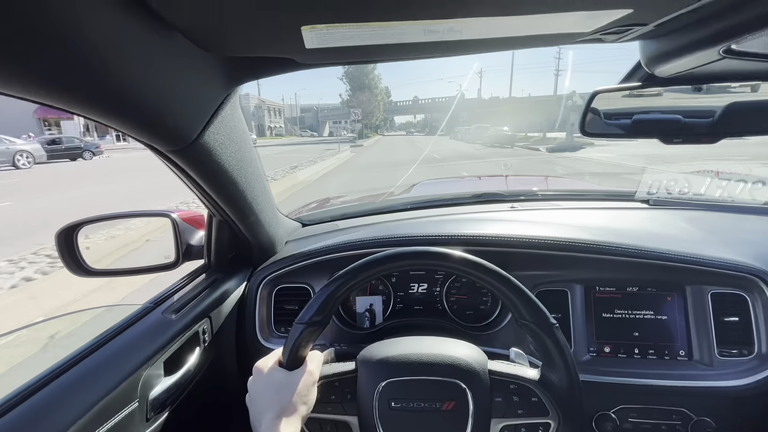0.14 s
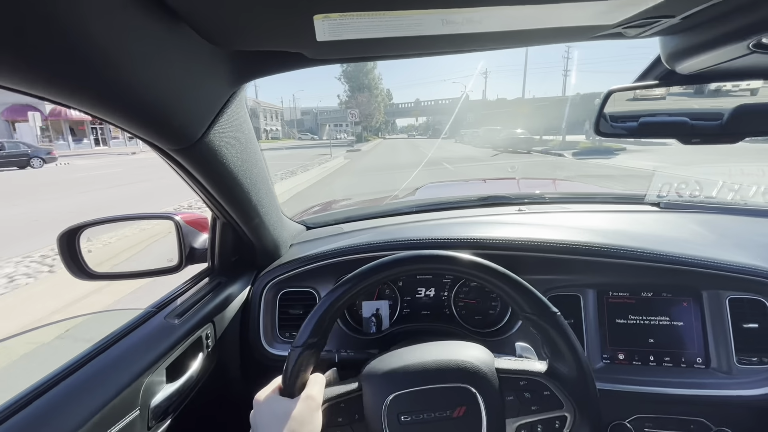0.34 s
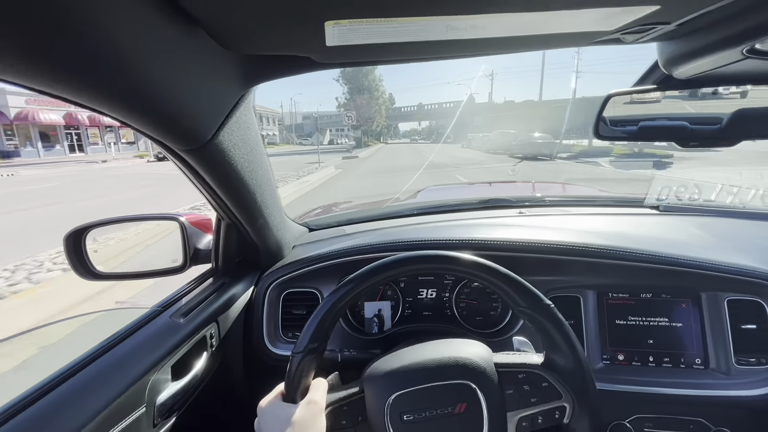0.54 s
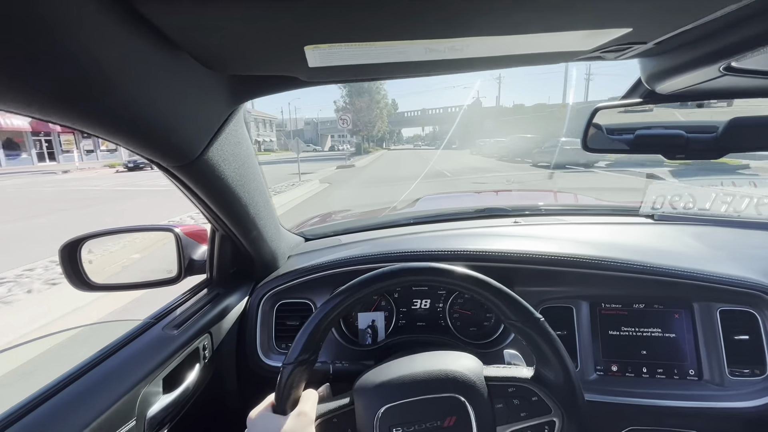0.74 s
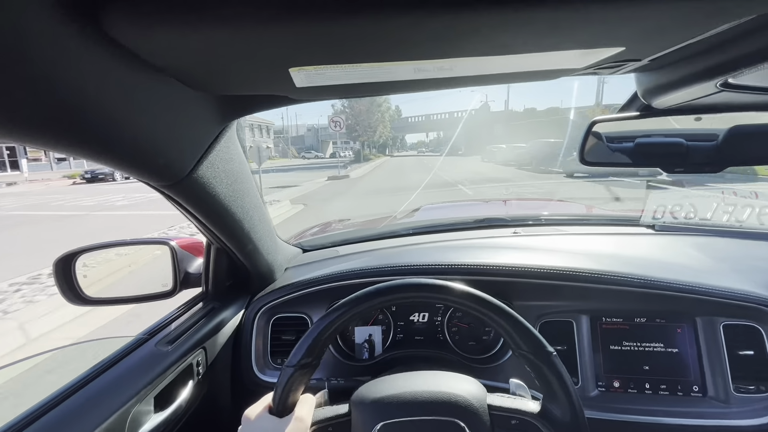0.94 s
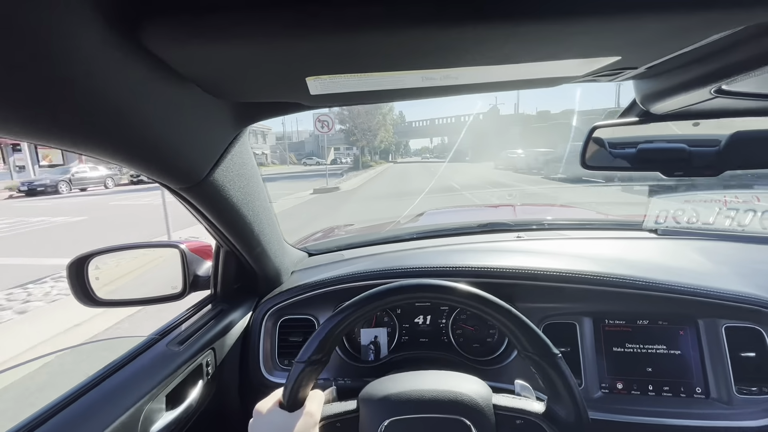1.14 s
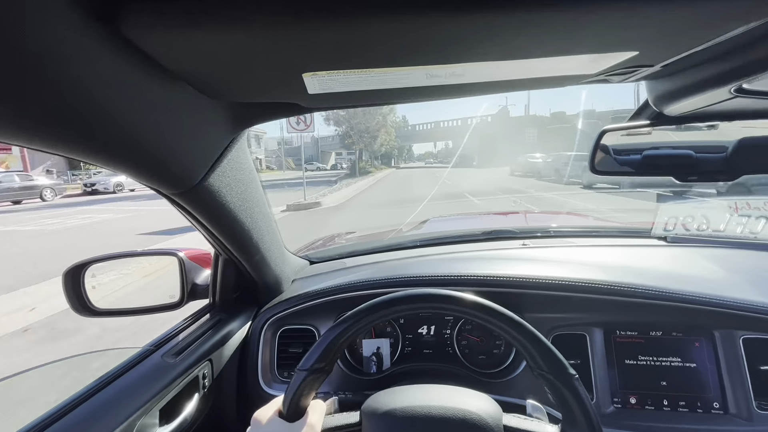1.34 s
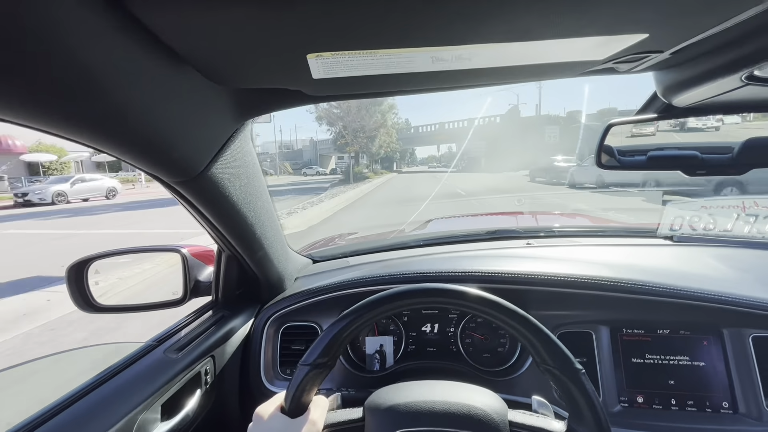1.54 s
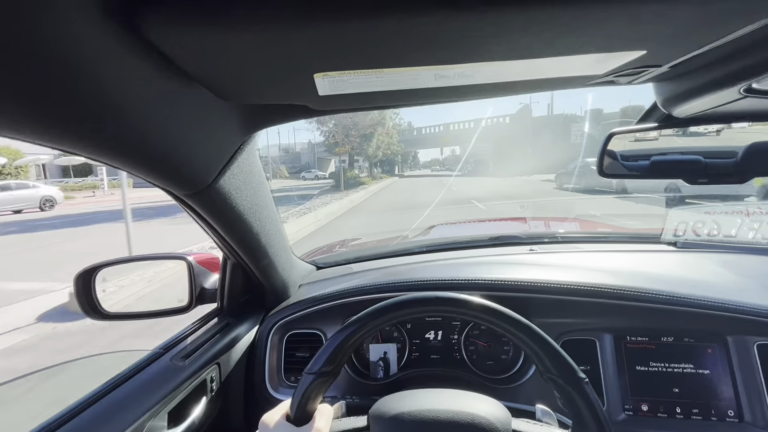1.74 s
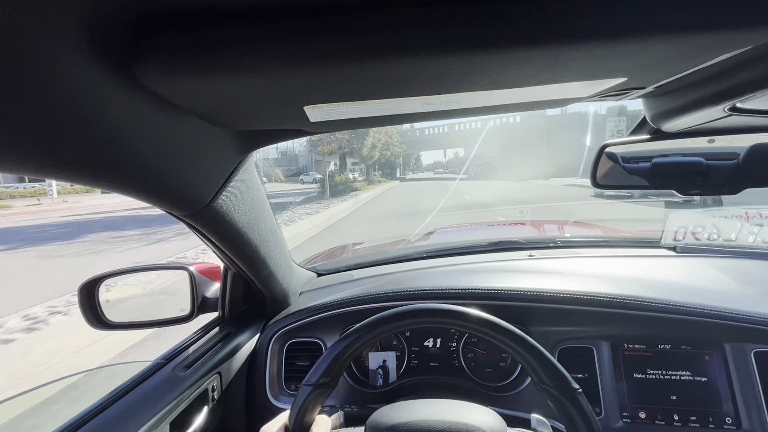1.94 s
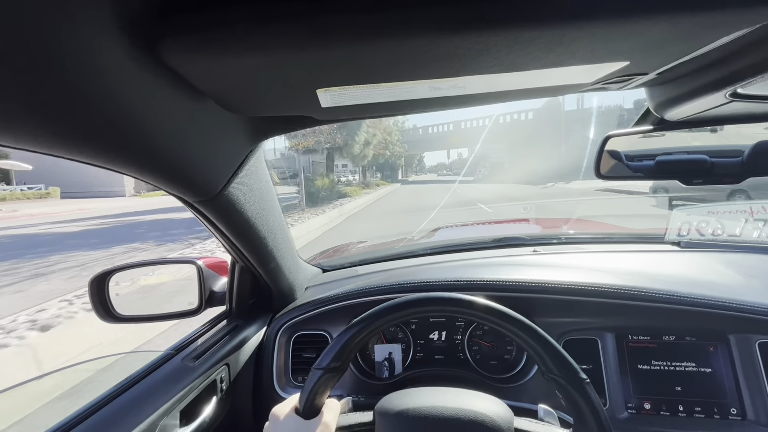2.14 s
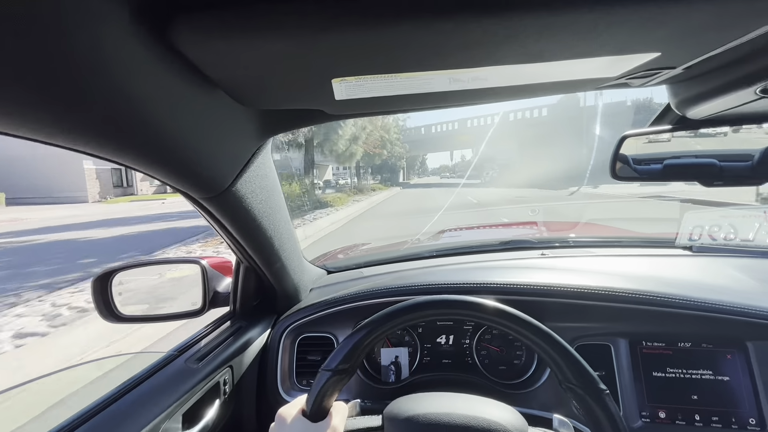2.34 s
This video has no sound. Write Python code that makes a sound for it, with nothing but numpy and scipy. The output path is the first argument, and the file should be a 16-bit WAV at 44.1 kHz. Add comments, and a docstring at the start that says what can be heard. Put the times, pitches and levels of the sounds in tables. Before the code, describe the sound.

Loud raspy V8 growl climbs in pitch, crackles at a gear shift, and falls to a low drone

```python
"""A V8 pulls hard, heard from the driver's seat; it shifts up as the throttle closes near 1 s, then cruises.
The exhaust is a sum of multiples of the engine cycle rate, shaped by the resonances of pipe and cabin.
Each firing gates turbulent noise into a puff of rush and rasp; one cylinder cracks once a cycle, then pops in
the shift. A drone of low orders swells in the booms of the body shell, over filtered noise for tyres and wind."""
import sys
import numpy as np
from scipy import signal
from scipy.fft import rfft, irfft, next_fast_len
from scipy.io import wavfile

SR = 44100
rng = np.random.default_rng(int(sys.argv[2]) if len(sys.argv) > 2 else 0)


def int16_out(signal):
    """Quantize to a 16-bit WAV file."""
    q = np.round(np.clip(np.atleast_2d(signal).T, -1, 1) * 32767)
    wavfile.write(sys.argv[1], SR, q.astype(np.int16))


N = 105972
TIME = np.arange(N) / SR
SIDES = np.array([[1], [-1]])   # left, right

FIRST_FIRING = .465   # place of the cracking cylinder in the engine cycle (cycles)
IN_STEP_ORDERS = 14   # orders above this are scrambled by reflections

# orders of the exhaust under load: order (multiple of the cycle rate), relative_level_db
PULL_ORDERS = [(2, -29), (3, -20), (4, -19.5), (5, -14), (6, -36), (7, -43), (8, -21.5), (9, -20),
               (10, -37), (11, -25), (12, -49.5), (13, -28.5), (14, -35.5), (15, -35.5), (16, -27),
               (17, -36), (18, -26.5), (19, -33), (20, -39), (21, -33.5), (22, -48), (23, -31.5), (24, -60),
               (25, -33.5), (26, -34.5), (27, -43), (28, -39.5), (29, -35.5), (30, -34.5), (31, -45.5),
               (32, -42.5), (33, -50), (34, -35)]
# resonances and notches of pipe and cabin: centre_hz, spread_hz (standard deviation), gain_db
CABIN_RESONANCES = [(86.2, 4.9, 11), (129.8, 7.3, 5.5), (249, 14, -8), (257.5, 2.4, 3), (289.2, 2.7, -6),
                    (350, 20, 5.5), (392, 15, -17), (411, 12, 4.5), (458.4, 10.6, 9.5), (506.5, 5.9, 0.5),
                    (541, 4.6, -14), (560, 21, 3.5), (589.8, 2.5, -8.5), (639, 21, -4.5), (735, 35, 2.5)]
# load on the engine: time_s, gain_db
LOAD = [(0, 1), (.2, -1.5), (.5, -3.5), (.81, -6), (.92, -5.5), (1.0, -7.5), (1.06, -12.5), (1.1, -15.5),
        (1.16, -44), (2.4, -70)]
# uneven firing in the shift moves power between low orders: order, centre_s, spread_s, gain_db
SHIFT_SWELLS = [(4, .93, 0.062, 7), (3, .95, .035, -8), (3, 1.032, 0.018, 7), (4, 1.018, .02, -5),
                (9, 0.953, 0.035, -4), (8, .95, 0.053, -11.5), (6, 1.5, .06, 1)]
# gain of the orders above the in-step ones, fading in the shift: time_s, gain_db
UPPER_ORDERS = [(0, -1), (.4, 0), (.82, 0), (.9, -1), (1.1, -2.5)]
# the firing turns ragged in the shift: time_s, roughness (0-1)
RAGGED = [(0, .05), (.81, .06), (.88, .17), (1.06, .22)]
ROUGH_ORDER = 19   # order at which the roughness has doubled
THROB_DEPTH, THROB_LEAD = .27, .31   # once-a-cycle swell: depth, phase lead (cycles); peaks just before the crack
BASS_PAN_DB = -0.5   # left minus right


def exhaust(cycles, rate):
    """Source-filter principle: harmonics of the engine cycle sweep through fixed resonances of pipe and cabin."""
    (load_db,), (rough,), (upper_db,) = in_time(LOAD), in_time(RAGGED), in_time(UPPER_ORDERS)
    throb = 1 + THROB_DEPTH * np.sin(2 * np.pi * (cycles - FIRST_FIRING + THROB_LEAD))
    upper_gain = from_db(upper_db) * throb
    total = 0
    for order, order_db in PULL_ORDERS:
        swells = [row[1:] for row in SHIFT_SWELLS if row[0] == order]
        shift_db = bumps_db(swells, TIME)
        cabin_db = bumps_db(CABIN_RESONANCES, order * rate)
        tone = partial(order, cycles, rate, rough * (1 + (order / ROUGH_ORDER) ** 2))
        tone = from_db(order_db + cabin_db + load_db + shift_db) * tone
        if order > IN_STEP_ORDERS:
            tone = tone * upper_gain
        total = total + tone
    return total * from_db(SIDES * BASS_PAN_DB / 2)


# spectral envelope of the upper orders: frequency_hz, relative_level_db
GROWL_SPECTRUM = [(1100, 5.5), (1300, 6.5), (1600, 7.5), (1900, 4), (2300, -10), (2750, -12), (3400, -21)]
# left minus right of the engine's treble: frequency_hz, difference_db
LEAN = [(200, -12.5), (550, 4), (1000, 0.5), (1900, 5.5), (2800, 0.5), (3800, -5), (6000, 2.5), (9000, -2)]
# level of the rasp, whose fall the growl also follows: time_s, level_db
RASP = [(0, -28.5), (.2, -32.5), (.5, -35), (.82, -36.5), (.91, -31.5), (.97, -38.5), (1.005, -38.5),
        (1.035, -46.5), (1.2, -58.5), (1.35, -62.5), (2.4, -90)]
GROWL_DB, GROWL_ROUGH = -32, .2
GROWL_PUFF = 0.11   # share of the growl shaped by the puffs


def growl(cycles, rate, firing):
    """Amplitude modulation: rough upper orders throb with the firings and follow the fall of the rasp."""
    rasp_db, = in_time(RASP)
    total = 0
    for order in range(35, 88):
        hz = order * rate[:SR].mean()
        level_db = at_hz(GROWL_SPECTRUM, hz) + SIDES * at_hz(LEAN, hz) / 2 + rng.normal(0, 3.5)
        total = total + from_db(level_db) * partial(order, cycles, rate, GROWL_ROUGH)
    throbbing = total * (1 - GROWL_PUFF + GROWL_PUFF * rms_one(firing))
    return from_db(GROWL_DB + rasp_db - rasp_db[0]) * rms_one(throbbing)


# level of the rush of gas in the pipes: time_s, level_db
RUSH = [(0, -30.5), (.4, -23.5), (.8, -25), (.92, -24), (1.06, -25.5), (1.16, -37), (1.3, -40.5),
        (1.5, -45.5), (2.4, -95.5)]
# colour of the rush: frequency_hz, relative_level_db
RUSH_SPECTRUM = [(25, -16), (55, -5.5), (85, 3.5), (130, -18.5), (180, 1.5), (225, -1), (270, -3.5),
                 (335, 6.5), (390, 0.5), (455, 9.5), (530, -35.5), (605, 2.5), (680, -3.5), (900, -6),
                 (1300, -18), (2500, -38.5), (8000, -58.5)]
# colour of the rasp: frequency_hz, relative_level_db
RASP_SPECTRUM = [(300, -27), (700, -27.5), (1100, -2.5), (1500, -2), (1950, 0), (2800, 1), (3300, -7),
                 (4000, -7.5), (5000, -13.5), (6500, -21), (8200, -18), (10500, -39.5), (13000, -24.5),
                 (15500, -48)]


def gas(firing):
    """Turbulence noise gated by pulsed flow: every firing gives a low rush and a bright rasp."""
    rush = from_db(in_time(RUSH)[0]) * cabin_noise(RUSH_SPECTRUM, firing)
    rasp = from_db(in_time(RASP)[0]) * cabin_noise(RASP_SPECTRUM, firing)
    return rush + rasp


# onset level of the crack under load: time_s, level_db
CRACK = [(0, -12.5), (.25, -15), (.6, -17), (.83, -17.5)]
# pops that replace the cracks as the throttle closes: start_s, level_db
POPS = [(.857, -16.5), (.883, -13), (.911, -11.5), (.939, -15), (.969, -21), (1.0, -16.5)]
# colour of cracks and pops: frequency_hz, relative_level_db
CRACK_SPECTRUM = [(300, -9.5), (600, 16.5), (1100, 18), (1500, -5), (2000, 12), (2800, 8.5), (3800, 2),
                  (5000, -7), (6500, -25), (8500, -23.5), (15000, -39)]
SHIFT_S = .845   # cracks stop here
CRACK_DECAY_S = .0007
CRACK_FRESH = .8   # amplitude of fresh noise relative to the repeated part
CRACK_RING, CRACK_RING_S = .32, .005   # ring in the pipe: relative amplitude, decay (s)


def crack(cycles, rate):
    """Impulsive excitation: a partly repeated noise burst, mixed with fresh noise at each blow, rings briefly."""
    crack_s, crack_db = np.transpose(CRACK)
    beats = np.interp(np.arange(FIRST_FIRING, cycles[-1]), cycles, TIME)
    cracks = [(s, np.interp(s, crack_s, crack_db)) for s in beats if s < SHIFT_S]
    start, level_db = np.transpose(cracks + list(POPS))
    latest = np.searchsorted(start, TIME) - 1
    age = np.abs(TIME - start[latest])
    # noise read by age is the part that repeats at each blow
    repeated = rng.standard_normal((2, N))[:, (age * SR).astype(int)]
    burst = repeated + CRACK_FRESH * rng.standard_normal((2, N))
    decay = np.hypot(np.exp(-age / CRACK_DECAY_S), CRACK_RING * np.exp(-age / CRACK_RING_S))
    gate = from_db(level_db[latest]) * decay
    return np.sqrt(np.mean(gate ** 2)) * cabin_noise(CRACK_SPECTRUM, gate, white=burst)


# orders of the exhaust at light throttle: order (multiple of the cycle rate), relative_level_db
CRUISE_ORDERS = [(2, -46.5), (3, -34), (4, -37.5), (5, -34.5), (6, -45), (7, -59), (8, -39.5), (9, -44.5),
                 (10, -45.5), (11, -45), (12, -50), (13, -48.5), (14, -53.5), (15, -58.5), (16, -56),
                 (17, -49)]
# booms of the body shell at light throttle: centre_hz, spread_hz (standard deviation), gain_db
SHELL_BOOMS = [(76, 8, 4.5), (126.3, 2.4, 6), (197, 18.2, 9.5), (265.4, 9, 9), (349, 14, 6)]
# gain of the cruising drone: time_s, gain_db
DRONE = [(0, -46.5), (1.0, -1), (1.15, -7), (1.4, -2), (1.7, -0.5), (1.87, -1), (2.0, -0.5), (2.1, -4),
         (2.4, -4)]
DRONE_ROUGH = .17


def drone(cycles, rate):
    """Structural resonance: soft low orders swell as they slide through the booms of the body shell."""
    total = 0
    for order, order_db in CRUISE_ORDERS:
        boom_db = bumps_db(SHELL_BOOMS, order * rate)
        total = total + from_db(order_db + boom_db) * partial(order, cycles, rate, DRONE_ROUGH)
    return from_db(in_time(DRONE)[0]) * total


# tyres on the road: time_s, rumble_level_db, hiss_level_db
ROAD = [(0, -35, -47.5), (.7, -34.5, -45), (1.1, -23.5, -48.5), (1.35, -32.5, -50), (1.7, -30, -47.5),
        (1.87, -27, -48), (2.15, -25, -44.5), (2.4, -29.5, -47)]
# colour of the rumble: frequency_hz, relative_level_db
RUMBLE_SPECTRUM = [(22, -21), (32, 0.5), (50, 1.5), (75, 0), (105, -3.5), (140, -6), (190, -2.5),
                   (235, -14), (280, -9.5), (350, -16.5), (430, -20.5), (600, -27), (1000, -47.5),
                   (3000, -89.5)]
# colour of the hiss: frequency_hz, relative_level_db
HISS_SPECTRUM = [(300, -15.5), (500, -3), (800, -1.5), (1000, -7), (1400, -16), (1900, -22), (2700, -25.5),
                 (3500, -32), (4600, -31.5), (5800, -39), (15000, -53.5)]


def road():
    """Broadband rolling noise: tyre rumble through the body and a faint hiss above it."""
    rumble_db, hiss_db = in_time(ROAD)
    rumble = from_db(rumble_db) * cabin_noise(RUMBLE_SPECTRUM, lean=0)
    hiss = from_db(hiss_db) * cabin_noise(HISS_SPECTRUM, lean=0)
    return rumble + hiss


# air over the body: time_s, level_db
WIND = [(0, -63), (1.3, -62.5), (1.5, -69.5), (1.75, -67.5), (1.95, -60.5), (2.15, -61), (2.4, -63)]
# colour of the air: frequency_hz, relative_level_db
WIND_SPECTRUM = [(800, -10.5), (1900, -2.5), (2700, 3), (3500, -6.5), (4600, -5.5), (5800, -15),
                 (7800, -11.5), (10000, -26), (15000, -30)]


def wind():
    """Aerodynamic noise: air over the body is a faint filtered hiss."""
    return from_db(in_time(WIND)[0]) * cabin_noise(WIND_SPECTRUM, lean=0)


PIPE_LAG, PIPE_SMEAR = 1.267, .147   # delay of the lowest orders (cycles); each higher order comes sooner
WAVER_HZ = 11   # corner of the slow random waver
SPREAD_HZ, SPREAD_RAD = 500, 1.35   # above this pitch the sides fall out of step, by about this phase or more


def partial(order, cycles, rate, rough):
    """Dispersion and random modulation: one order, nominally rms 1, delayed by the pipe and wavering."""
    angle = 2 * np.pi * order * (cycles - PIPE_LAG + PIPE_SMEAR * order)
    high = (order * rate.mean() / SPREAD_HZ) ** 4
    apart = SPREAD_RAD * high / (1 + high) * rng.uniform(1, 1.52) * rng.choice([-1, 1])
    waver = 1 + rough * (drift(WAVER_HZ) + 1j * drift(WAVER_HZ))
    if order > IN_STEP_ORDERS:
        waver = waver * ripple(order * rate) * np.exp(2j * np.pi * rng.random())
    tone = np.real(waver * np.exp(1j * angle) * np.exp(.5j * apart * SIDES))
    return tone * np.sqrt(2 / (1 + 2 * rough ** 2))


RIPPLE_HZ, RIPPLE_DEPTH = 20, .45   # spacing and depth of the peaks and dips made by reflections


def ripple(hz):
    """Multipath interference: reflections add differently at each pitch, so a gliding tone swells and breaks."""
    grid = np.arange(0, 4000, RIPPLE_HZ)
    echoes = rng.standard_normal(len(grid)) + 1j * rng.standard_normal(len(grid))
    response = 1 + RIPPLE_DEPTH * np.interp(hz, grid, echoes)
    return response / np.sqrt(np.mean(np.abs(response[:SR]) ** 2))


def puffs(cycles, strengths_db, decay, scatter_db):
    """Pulsed flow: evenly spaced bursts in each engine cycle, each of its own strength, decay exponentially."""
    count = len(strengths_db)
    place = (cycles - FIRST_FIRING + 2) * count
    index = place.astype(int)
    level_db = np.array(strengths_db)[index % count] + scatter_db * rng.standard_normal(N)[index]
    return from_db(level_db) * np.exp(-(place - index) / count / decay)


# left-right likeness of noise in the cabin: frequency_hz, correlation (-1 to 1)
LIKENESS = [(60, 0.99), (200, 0.99), (350, 1), (550, 0.55), (1000, 0.33), (2200, 0.13), (4500, -0.32),
            (8000, -0.35), (14000, 0.83)]


def cabin_noise(spectrum, gate=1, lean=1, white=None):
    """Interaural coherence: gated, coloured noise mixes mid and side to the cabin's likeness; rms 1."""
    if white is None:
        white = rng.standard_normal((2, N))
    size = next_fast_len(N + SR // 10)
    hz = np.arange(size // 2 + 1) * SR / size
    mid, side = rfft(white * gate, size)
    alike = np.clip(at_hz(LIKENESS, hz), -1, 1)
    level_db = at_hz(spectrum, hz) + lean * SIDES * at_hz(LEAN, hz) / 2
    gain = from_db(level_db) * (hz > 20)
    stereo = np.sqrt(1 + alike) * mid + SIDES * np.sqrt(1 - alike) * side
    return rms_one(irfft(gain * stereo, size)[:, :N])


def bumps_db(rows, at):
    """Resonance curve: a sum of bell-shaped peaks and dips, each (centre, spread, dB)."""
    return sum(db * np.exp(-.5 * ((at - centre) / spread) ** 2) for centre, spread, db in rows)


def drift(rate):
    """Low-passed random motion of spread 1; rate is the filter's pole frequency in Hz."""
    # computed at every 40th sample, then joined by straight lines
    r = np.exp(-80 * np.pi * rate / SR)
    white = rng.standard_normal(N // 40 + 2002)
    slow = signal.lfilter([1], [1, -2 * r, r * r], white)[2000:]
    return np.interp(np.arange(N) / 40, np.arange(len(slow)), rms_one(slow))


def from_db(db):
    """Logarithmic level: decibels to amplitude gain."""
    return 10 ** (np.asarray(db) / 20)


def rms_one(x):
    """Effective value: scale to unit rms."""
    return x / np.sqrt(np.mean(x ** 2) + 1e-20)


def in_time(rows):
    """Linear interpolation: each column of a time curve at every sample."""
    s, *columns = np.transpose(rows)
    return [np.interp(TIME, s, column) for column in columns]


def at_hz(points, hz):
    """Logarithmic pitch: read a spectrum on a log-frequency axis."""
    f, value = np.transpose(points)
    return np.interp(np.log(np.maximum(hz, 1)), np.log(f), value)


# engine speed: time_s, speed_rpm
ENGINE_SPEED = [(0.0, 3732), (0.136, 3942), (0.354, 4218), (0.744, 4632), (0.82, 4662), (0.892, 4368),
                (0.995, 3960), (1.056, 3432), (1.13, 3120), (1.344, 3180), (1.632, 3180), (1.852, 3108),
                (1.95, 2976), (2.104, 2628), (2.252, 2508), (2.4, 2508)]
# relative strength of the puffs in firing order: level_db
CYLINDER_DB = [-4, -3, -2, -5, -13, -5, -13, -15]
PUFF_DECAY, PUFF_SCATTER_DB = .06, 1.0   # decay in cycles, random strength in dB
PUFF_FLOOR = .4   # steady flow added beneath the puffs


def scene():
    """Four-stroke timing: one engine cycle takes two revolutions and drives every engine layer."""
    rate = in_time(ENGINE_SPEED)[0] / 120   # cycles per second
    cycles = np.cumsum(rate) / SR
    firing = PUFF_FLOOR + puffs(cycles, CYLINDER_DB, PUFF_DECAY, PUFF_SCATTER_DB)
    engine = exhaust(cycles, rate) + growl(cycles, rate, firing) + gas(firing) + crack(cycles, rate)
    return engine + drone(cycles, rate) + road() + wind()


FADE_S, CUTOFF_HZ = .004, 15700


def record(dry):
    """Band limiting: the ends are eased and a steep low-pass cuts the top."""
    to_edge_s = np.minimum(TIME, TIME[::-1])
    ease = np.sin(np.pi / 2 * np.clip(to_edge_s / FADE_S, 0, 1)) ** 2
    low_pass = signal.cheby2(12, 70, CUTOFF_HZ, fs=SR, output="sos")   # 70 dB down at the cutoff
    return signal.sosfilt(low_pass, dry * ease)


dry = scene()
out = record(dry)
int16_out(out)
```